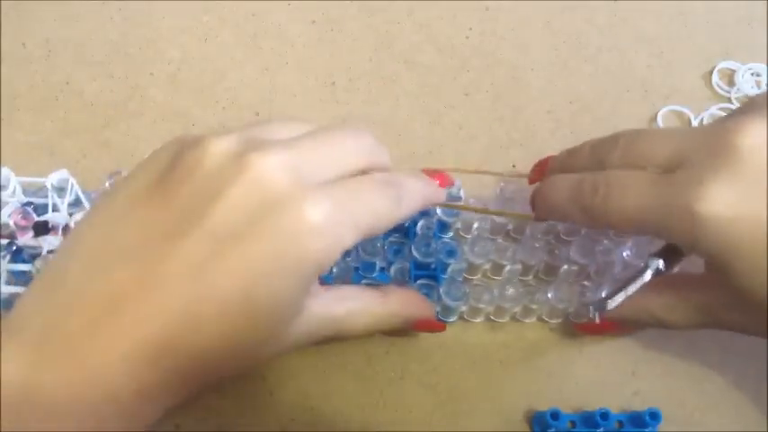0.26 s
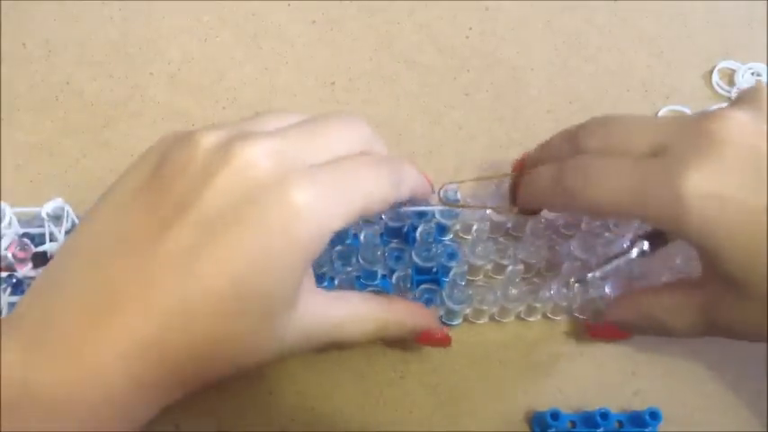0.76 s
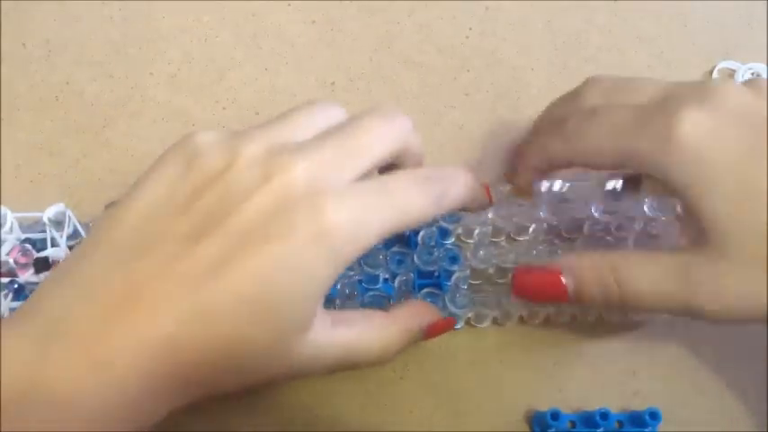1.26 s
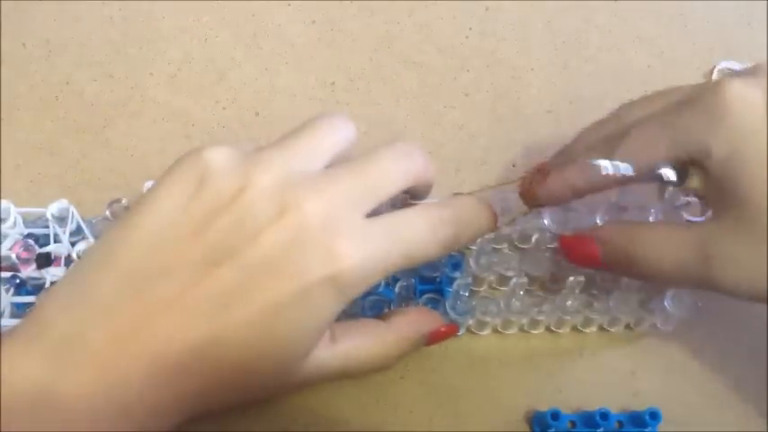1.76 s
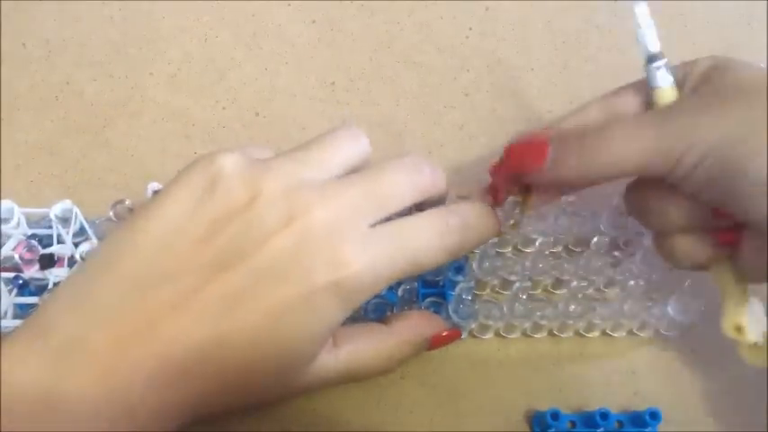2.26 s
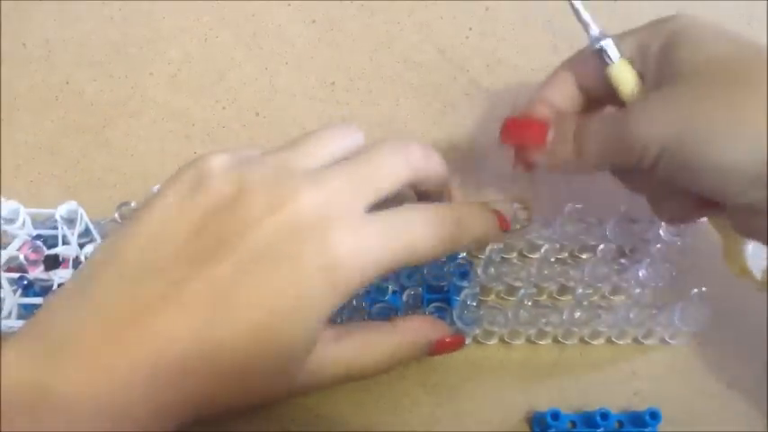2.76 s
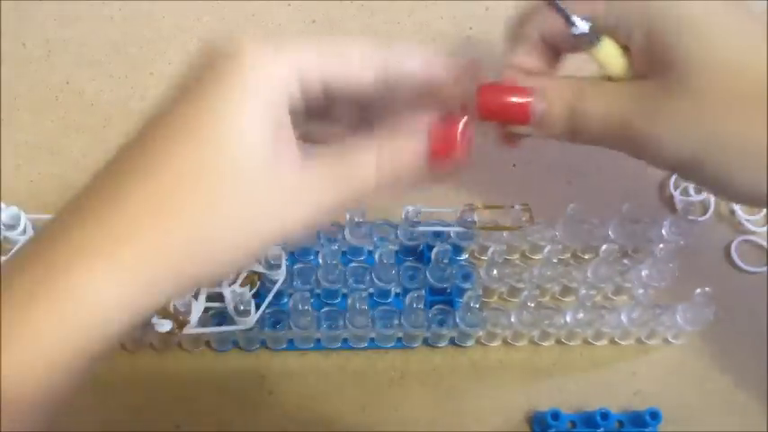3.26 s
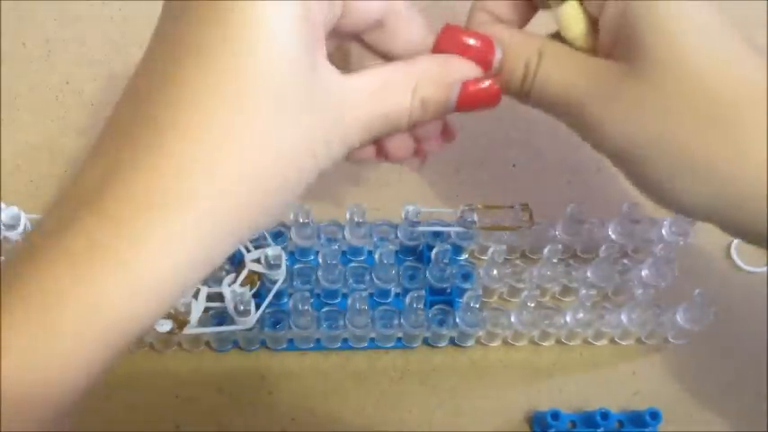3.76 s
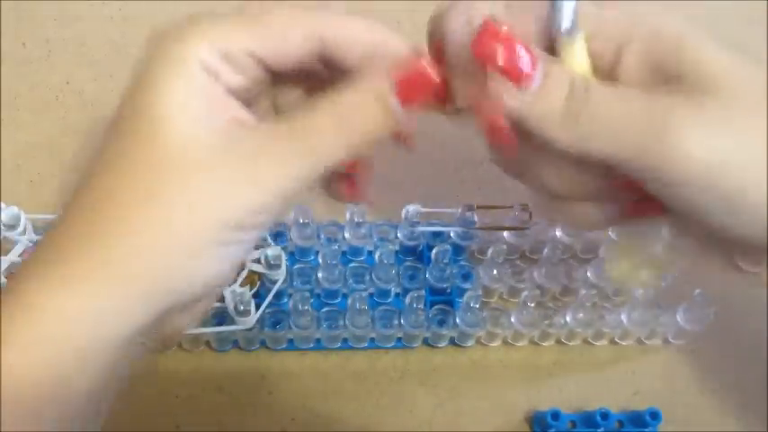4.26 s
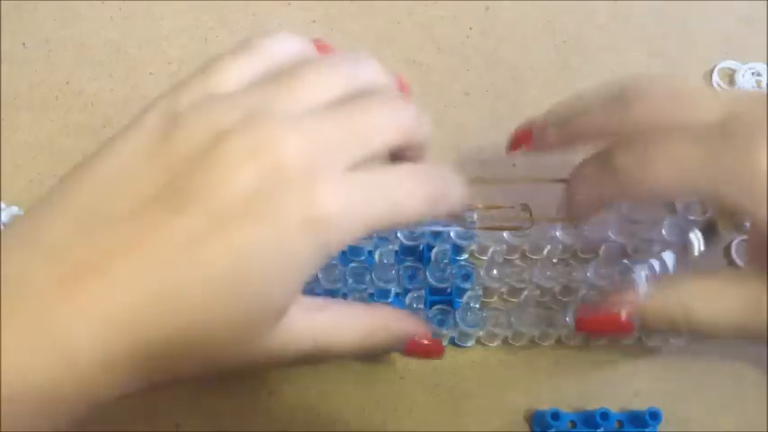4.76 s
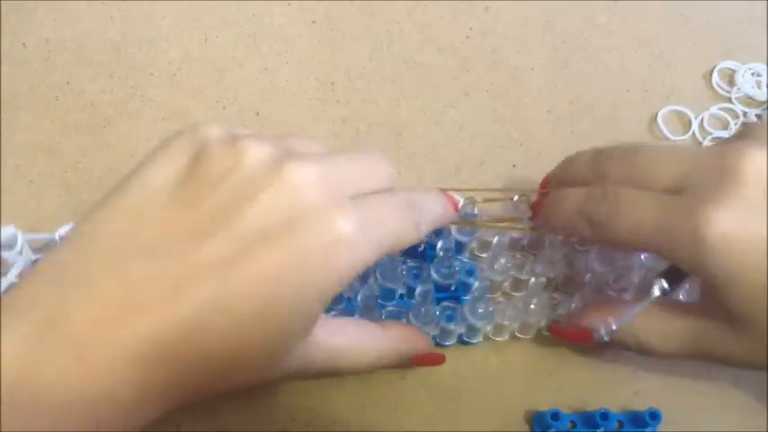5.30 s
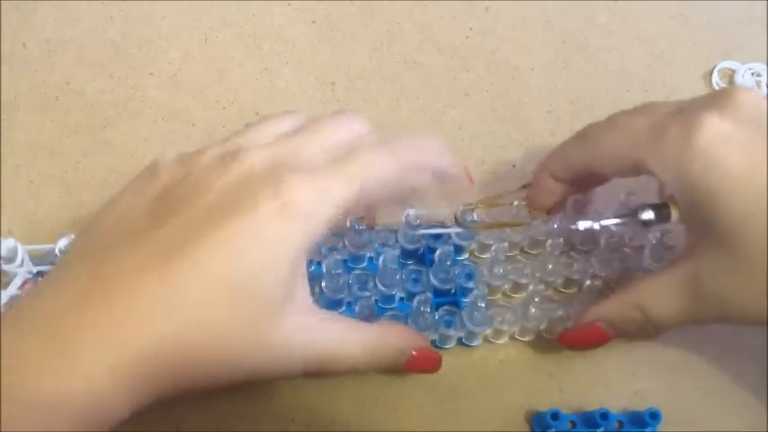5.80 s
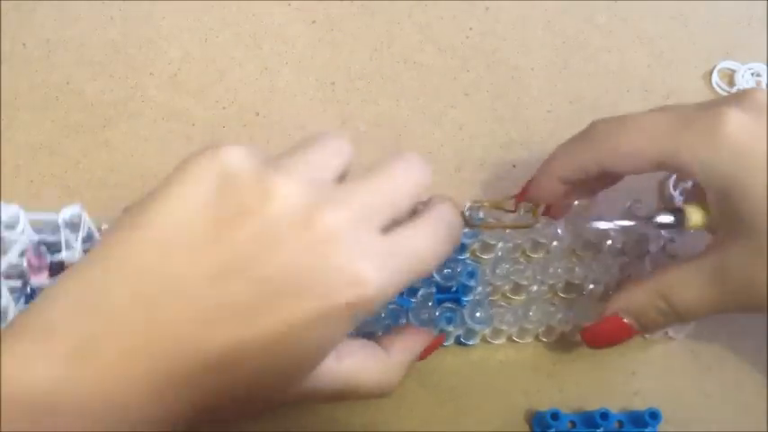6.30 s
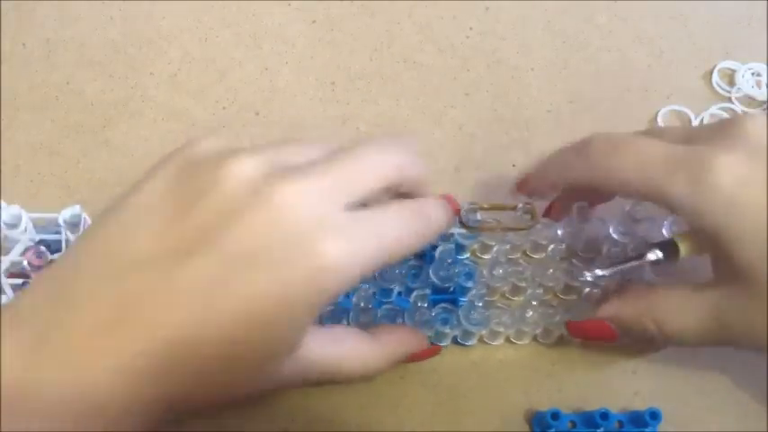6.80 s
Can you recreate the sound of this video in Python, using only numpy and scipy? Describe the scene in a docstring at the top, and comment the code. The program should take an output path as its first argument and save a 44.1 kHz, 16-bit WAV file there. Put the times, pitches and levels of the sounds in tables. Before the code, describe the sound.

Hollow plastic knocks and crisp little clicks as hands fit rubber bands over loom pegs on a table, close up in a small quiet room.

```python
"""Rubber bands on a plastic loom

Hands fit rubber bands over the pegs of a loom on a table, close to a phone in a small quiet room.
Knocks are thuds with ringing loom tones and a low table boom; clicks are bursts of tiny ticks ringing a peg.
Filtered noise makes the loom's scrape, the soft rubs on the pegs, the room's hush and a far low hum.
A few echoes and a fading noise tail place the knocks and clicks in the room."""
import sys
import numpy as np
from scipy import signal
from scipy.fft import rfft, irfft
from scipy.io import wavfile
from scipy.ndimage import uniform_filter1d

SR = 44100
rng = np.random.default_rng(int(sys.argv[2]) if len(sys.argv) > 2 else 0)


def int16_out(signal):
    """Quantize to a 16-bit WAV file."""
    q = np.round(np.clip(np.atleast_2d(signal).T, -1, 1) * 32767)
    wavfile.write(sys.argv[1], SR, q.astype(np.int16))


N = 310447  # length in samples, about 7 s


def undb(db):
    """Turn decibels into a gain."""
    return 10 ** (np.asarray(db) / 20)


def unit(x):
    """Scale a sound to an rms level of 1."""
    return x / np.sqrt(np.mean(x ** 2))


def coloured(n, points):
    """Noise at rms 1 whose spectrum follows points of (pitch_hz, level_db)."""
    hz, db = np.transpose(points)
    noise_hz = np.fft.rfftfreq(n, 1 / SR) + 1  # the 1 avoids log(0)
    shape = undb(np.interp(np.log(noise_hz), np.log(hz), db))
    return unit(irfft(rfft(rng.standard_normal(n)) * shape, n))


def ring(t, hz, t60):
    """Rows of sine tones, each fading by 60 dB in its t60 seconds, as struck objects do."""
    return np.sin(2 * np.pi * hz[:, None] * t) * 1000 ** (-t / t60[:, None])


def add(track, s, sound):
    """Mix a sound into the track at time s in seconds."""
    i = int(s * SR)
    track[i:i + len(sound)] += sound[:N - i]


def walk(rate):
    """A random curve gliding towards a new value about `rate` times a second."""
    k = int(SR / rate)
    steps = np.repeat(rng.standard_normal(N // k + 1), k)
    return uniform_filter1d(steps, k)[:N]


# Knocks of the loom on the table: start_s (before KNOCK_DELAY_S), peak_db (direct blow without boom),
# pitch_hz (tones near it ring most), boom_db and edge_db (table boom and sharp edge, before their fades,
# relative to the blow), share (free ringing, 0-1)
LOOM_KNOCKS = [(0.096, -37, 330, -32, -37, 0.6), (0.111, -34, 560, -25, -26, 0.55),
               (0.135, -23.5, 334, -20.5, -19, 0.64), (0.333, -39.5, 543, -36, -12, 0.45),
               (0.429, -22, 323, -30, -39, 0.23), (0.47, -19, 470, -29, -35, 0.87),
               (0.481, -22.5, 442, -35, -26, 0.24), (0.518, -10.5, 369, -19.5, -10, 0.37),
               (0.713, -42.5, 377, -17, 10, 0.65), (0.774, -51, 610, -30, -14, 0.75),
               (0.836, -50.5, 730, 3, -25, 0.85), (0.95, -47.5, 596, 0, -33, .8),
               (1.013, -47.5, 630, -10, -27, 0.73), (1.055, -46, 555, -23, -25, 0.8),
               (1.088, -48, 624, -30, -22, 0.8), (1.137, -46.5, 270, 1, -29, 0.05),
               (1.188, -39, 323, -22, -28, 0.5), (1.208, -33, 243, -1, -15, 0.29),
               (1.444, -29.5, 690, -17.5, -2, 0.77), (1.558, -46.5, 640, -19, 1, 0.48),
               (1.668, -54, 980, -22, -10, 1), (1.699, -38.5, 1020, -14, -4, 0.52),
               (1.722, -41, 1020, 1, -14, 0.87), (1.77, -42, 580, -19, 2, 0.9),
               (1.789, -45.5, 205, -6, -21, 0.29), (1.867, -53, 220, -7, -24, 0.3),
               (2.408, -47, 690, -24, -22, 0.4), (2.436, -48, 263, -17, -27, 0.83),
               (2.508, -43.5, 514, -2.5, -0.5, 0.6), (2.634, -41.5, 653, -27, -1, 0.29),
               (2.829, -38, 297, -4, -42, 0.24), (3.114, -42, 396, -5, -14, 0.86),
               (3.237, -46, 296, 6, -25, 0.5), (4.162, -42.5, 814, -38, 0, 0.35),
               (4.5, -48.5, 403, -40.5, 2, 0.86), (4.87, -36.5, 620, -1, -26, 0.43),
               (5.063, -52.5, 720, -9, -18, .25), (5.444, -16.5, 396, -14, -15.5, 0.42),
               (5.703, -41.5, 606, -28, 1, 0.53), (5.847, -30, 480, -24, -40, 0.46),
               (5.95, -48.5, 323, -32, -21, 0), (6.002, -47.5, 570, -11, -5, 0.8),
               (6.068, -45, 1280, -9, -14, 0.33), (6.221, -39, 650, -37, -21, 0.96),
               (6.237, -35, 630, -30, -17, 0.38), (6.287, -21, 503, -31, 0.5, 0.4),
               (6.521, -35.5, 587, -37, 6, 0.62), (6.656, -48, 424, -33, -24, 0.07),
               (6.705, -30.5, 528, -37, 0, 0.16), (6.904, -12, 402, -26, -8, 0.35)]
# Tones of the loom and table top: pitch_hz (before a small random detune),
# level_db (relative, before weighting by the blow), t60_s (time to fade 60 dB)
LOOM_TONES = [(197.7, 23.5, 0.43), (269, -14.5, 0.19), (292, 8, 0.082), (323, 9, 0.19), (396, 4, 0.24),
              (433.4, 17, 0.11), (542, 3, 0.086), (620, 2, 0.089), (701.4, 3, 0.36), (813, -25.5, 0.041),
              (994, 2, 0.06), (1020, 6.5, .12), (1200, -31, 0.076), (1286, 7.5, 0.053)]
KNOCK_DELAY_S = 0.0043  # each knock sounds this long after its listed start
BOOM_HZ, BOOM_T60_S, BOOM_SWING_S = 146, 0.23, 0.06
KNOCK_ROOM_DB, KNOCK_ROOM_DB_PER_OCTAVE = 2, -2.5  # at 400 Hz; low blows fill the room more
RING_ROOM_DB = -4.5  # per unit of share: a freely ringing blow is heard more directly
PUFF_S = 0.0027  # fade of the short thud sent to the walls


def knocks(heard):
    """A quick thud sets off the tones near the blow's pitch, and the heavy table top booms below."""
    out, t = np.zeros(N), np.arange(SR // 2) / SR
    hz, db, t60 = np.transpose(LOOM_TONES)
    chance = rng.random((len(LOOM_KNOCKS), len(LOOM_TONES) + 1))
    for (s, peak_db, pitch, boom_db, edge_db, share), (spot, *detune) in zip(LOOM_KNOCKS, chance):
        # A freely ringing blow picks out fewer tones near its pitch.
        octaves = 0.6 - 0.18 * share
        reach = np.exp(-(np.log2(hz / pitch) / octaves) ** 2)
        detuned_hz = hz * (1 + 0.013 * (np.array(detune) - 0.5))
        tones = (undb(db) * reach) @ ring(t, detuned_hz, t60)

        thud_hz = (1.25 - 0.37 * share) * pitch
        thud, edge, boom = ring(t, np.array([thud_hz, 1400, BOOM_HZ]),
                                np.array([0.022, 0.0035, BOOM_T60_S]))
        boom = boom * (1 - np.exp(-t / BOOM_SWING_S))  # the heavy top takes a moment to swing
        blow = (1 - share) * thud + share * tones / np.abs(tones).max()
        blow = blow / np.abs(blow).max() + undb(edge_db) * edge

        # The walls get the thud and edge, without the loom's separate tones.
        puff = (1 - share) * thud * np.exp(-t / PUFF_S)
        to_walls = puff + share * thud + undb(edge_db - 6) * edge
        wet_db = KNOCK_ROOM_DB + KNOCK_ROOM_DB_PER_OCTAVE * np.log2(pitch / 400)
        wet_db += RING_ROOM_DB * (share - 0.45)
        sound = heard(blow, to_walls, spot, wet_db)
        sound[:len(t)] += undb(boom_db) * boom
        add(out, s + KNOCK_DELAY_S, -undb(peak_db) * sound)  # minus flips the wave
    return out


# Bands, nails and hook clicking on the pegs: start_s, peak_db (direct sound), pitch_hz,
# rattle_ms (time for the ticks to fade to about a third), reach_octaves (crack's reach above the pitch)
PEG_CLICKS = [(0.1072, -45.5, 5010, 3.5, 0.66), (0.3346, -37, 5340, 4.2, 1.7),
              (0.4736, -14.5, 5240, 5.25, 0.55), (0.5215, -31, 5860, 1.9, 1.5),
              (0.7169, -41.5, 6430, 3, 0.59), (0.7782, -32, 6300, 1.9, 0.35), (0.98, -38, 4670, 2.9, 1.02),
              (1.1139, -51, 8200, 2.6, 1.7), (1.1454, -46, 3800, 1.2, 0.62), (1.1942, -48, 8300, 1.9, 1.2),
              (1.3322, -56, 2890, 3, 0.42), (1.448, -28, 8450, 3.6, 2.9), (1.702, -34, 6630, 3, 0.73),
              (1.7894, -37, 6500, 1.1, 1.6), (1.816, -42, 6470, 2.1, 1.3), (2.5628, -46, 3940, 1.9, 1.5),
              (2.638, -41.5, 4470, 2.5, 0.85), (2.6674, -56, 6280, 2.2, 1.6), (2.689, -48, 2980, 3.4, 2.2),
              (2.831, -37.5, 6380, 2.5, 0.96), (2.898, -46, 3180, 1.4, 1.2), (2.969, -46, 3660, 2, 1.36),
              (3.0566, -46, 4500, 2.5, 0.91), (3.1439, -50, 6440, 3.3, 1.3), (3.829, -48.5, 2510, 1.1, 2.8),
              (3.902, -51.5, 2860, 1.7, 2.7), (4.0006, -54, 5270, 2.2, 1.5),
              (4.166, -28.5, 3270, 1.97, 2.8), (4.359, -44, 4260, 2.7, 3.8),
              (4.5007, -43.5, 5400, 2.2, 1.3), (4.8744, -39.5, 5320, 0.91, 0.35),
              (5.068, -40.5, 7250, 2, 1.2), (5.1996, -56.5, 5200, 1.8, 1.1),
              (5.3685, -54.5, 2620, 2.6, 0.85), (5.7051, -46.5, 2860, 3.5, 0.21),
              (5.8273, -44, 3020, 3.9, 0.87), (5.8483, -26, 3350, 4.2, 1.24),
              (5.8529, -28.5, 5450, 1.3, 1.6), (5.9485, -39.5, 7100, 2, 1.28),
              (6.0092, -36.5, 6560, 2, 1.7), (6.226, -39.5, 3470, 5.8, 1.45), (6.243, -40.5, 5130, 3.4, 1),
              (6.2902, -40.5, 2600, 3.1, 0.74), (6.523, -30, 6550, 2.8, 1.53),
              (6.907, -38.5, 2600, 1.6, 1.4)]
# Tones of one peg: ratio (times the click's pitch), level_db (relative), t60_s (time to fade 60 dB)
PEG_TONES = [(.8, -6, .003), (1.0, 0, .0045), (1.22, -3, .003), (1.6, -10, .003)]
BARE, BARE_PER_OCTAVE = 0.19, 0.24  # share of broad crack in a click; grows with the crack's reach
CLICK_ROOM_DB, CLICK_ROOM_DB_PER_OCTAVE = -0.2, -0.5  # wide cracks sound drier
# Octaves the crack reaches under a 5 kHz peg; more under higher pegs and for wide cracks
CRACK_BELOW, CRACK_BELOW_PER_OCTAVE, CRACK_BELOW_SHARE = 0.18, 0.82, 0.59


def clicks(heard):
    """A snap and a short rattle of smaller ticks ring a peg, mixed with a broad bare crack."""
    out, t = np.zeros(N), np.arange(1024) / SR
    ratio, db, t60 = np.transpose(PEG_TONES)
    grit = rng.standard_normal((len(PEG_CLICKS), 2, len(t)))
    spots = rng.random(len(PEG_CLICKS))
    for (s, peak_db, pitch, rattle_ms, above), (a, b), spot in zip(PEG_CLICKS, grit, spots):
        ticks = a * np.abs(b) * np.exp(-t * 1000 / rattle_ms)
        ticks[0] = 1.5  # the first snap
        peg = undb(db) @ ring(t, ratio * pitch, t60)

        # The crack is a single impulse, limited to a band around the pitch.
        below = CRACK_BELOW + CRACK_BELOW_PER_OCTAVE * np.log2(pitch / 5000) + CRACK_BELOW_SHARE * above
        below = max(below, 0.1)
        edges_hz = np.clip(pitch * 2 ** np.array([-below, above]), 300, 19000)
        band = signal.butter(2, edges_hz, "band", fs=SR, output="sos")
        crack = signal.sosfilt(band, t == 0)

        bare = np.clip(BARE + BARE_PER_OCTAVE * above, 0, 1)
        tick = (1 - bare) * peg / np.linalg.norm(peg) + bare * crack / np.linalg.norm(crack)
        click = signal.fftconvolve(ticks, tick)[:len(t)]  # every tick sets off the same sound
        wet_db = CLICK_ROOM_DB + CLICK_ROOM_DB_PER_OCTAVE * above
        add(out, s, undb(peak_db) * heard(click, tick, spot, wet_db))
    return out


# Loom dragged on the table: time_s, level_db (average level, around which the scrape wavers)
LOOM_DRAG = [(0.0, -68.5), (0.17, -65), (0.42, -71), (0.53, -58), (0.84, -67), (1.17, -61.5), (1.53, -74.5),
             (1.78, -63), (2.08, -70), (2.45, -72.5), (2.56, -66), (2.74, -69.5), (2.87, -65),
             (3.12, -64.5), (3.31, -74), (4.78, -70), (5.55, -64.5), (6.35, -69), (6.61, -59.5),
             (6.75, -74), (7.04, -60)]


def dragging():
    """Uneven friction of the loom on the table: dull noise whose level wavers."""
    t = np.arange(N) / SR
    scrape = coloured(N, [(90, -39), (146, 9.0), (300, 10.0), (650, 6.5), (1100, -2), (3000, -34.0)])
    scrape = unit(scrape * undb(4.3 * walk(23)))
    return scrape * undb(np.interp(t, *np.transpose(LOOM_DRAG)))


# Skin and rubber rubbing over the pegs: start_s, end_s, level_db (before fades and grain), centre_hz
PEG_RUBS = [(0.095, 0.123, -69, 4930), (0.794, 0.904, -75, 5000), (1.694, 1.766, -61, 3270),
            (1.76, 1.797, -60, 4170), (1.79, 1.84, -65.5, 5570), (1.867, 1.89, -67.5, 4370),
            (2.465, 2.614, -64, 4900), (2.642, 2.733, -72, 9000), (3.041, 3.102, -65.5, 6900),
            (4.477, 4.526, -69.5, 4930), (4.884, 4.908, -61.5, 4370), (6.065, 6.099, -66, 3200),
            (6.137, 6.165, -69.5, 3670), (6.218, 6.244, -58.5, 7000)]
RUB_OCTAVES, RUB_WIDENING = 1.3, 0.79  # width setting at 5 kHz; wider per octave of centre


def rubbing():
    """Friction of skin and rubber on the pegs: short bands of noise with a fast, grainy level."""
    out = np.zeros(N)
    grain = undb(2.5 * walk(440))
    for start, end, db, hz in PEG_RUBS:
        octaves = RUB_OCTAVES + RUB_WIDENING * np.log2(hz / 5000)
        near, far = 2 ** (octaves / 2), 4 ** octaves
        i, n = int(start * SR), int((end - start) * SR)
        rub = coloured(8192, [(hz / far, -30), (hz / near, -3), (hz, 0), (hz * near, -3), (hz * far, -30)])
        fade = signal.windows.tukey(n, 0.5)
        add(out, start, undb(db) * rub[:n] * fade * grain[i:i + n])
    return out


# Echoes from nearby surfaces: delay_ms, level_db (before each sound's own room level is added)
NEAR_ECHOES = [(3.3, -12.5), (6.5, -28.5), (12.5, -20), (29, -23.5)]
# Bands of the room's tail: centre_hz, level_db (before the scaling in room()), t60_s (time to fade 60 dB)
ROOM_TAIL = [(208, -16.5, 0.33), (519, -20.5, 0.25), (1087, -6, 0.19), (2963, -13.5, 0.23),
             (5860, -13.5, 0.27), (11830, -16, 0.23)]


def room():
    """Surfaces return a few echoes, then a diffuse noise tail that fades band by band."""
    t = np.arange(SR // 3) / SR
    bands = np.array([coloured(2 * SR, [(hz / 3, -40), (hz / 1.826, -3), (hz, 0),
                                        (hz * 1.19, -3), (hz * 3, -40)])
                      for hz, _, _ in ROOM_TAIL])
    hz, db, t60 = (column[:, None] for column in np.transpose(ROOM_TAIL))
    fade = undb(db - 24) * np.sqrt(hz / 10000) * 1000 ** (-t / t60)
    fade = fade * (1 - np.exp(-t / 0.00022))  # soft start

    def heard(sound, radiated, spot, wet_db):
        """The walls scatter the radiated sound's overall colour; fine detail comes directly and in echoes."""
        i = int(spot * SR)  # each spot uses its own stretch of the tail noise
        out = np.zeros(len(t) + len(sound))
        power = np.sqrt(np.sum(sound ** 2) / np.sum(radiated ** 2))  # match the direct sound's energy
        response = (bands[:, i:i + len(t)] * fade).sum(axis=0)
        tail = signal.fftconvolve(radiated * power, response)
        out[:len(tail)] = undb(wet_db) * tail
        out[:len(sound)] += sound
        for ms, echo_db in NEAR_ECHOES:
            k = int(ms * SR / 1000)
            out[k:k + len(sound)] += undb(echo_db + wet_db) * sound
        return out / np.abs(sound).max()
    return heard


# A far low hum that swells and fades: time_s, level_db
HUM_LEVEL = [(0, -68.5), (3.6, -76.5), (4.1, -68.5), (4.7, -71), (5, -95), (7.04, -73.5)]
HUM_HZ = 300.7


def hum():
    """A distant hum: a narrow band of noise that swells and fades."""
    noise = coloured(N, [(HUM_HZ / 2, -30), (HUM_HZ / 1.42, -6), (HUM_HZ, 0),
                         (HUM_HZ * 1.09, -8), (HUM_HZ * 2, -30)])
    return noise * undb(np.interp(np.arange(N) / SR, *np.transpose(HUM_LEVEL)))


# Colour of the hush and hiss: pitch_hz, level_db (relative)
HUSH_COLOUR = [(59, -44), (100, -3), (135, -4.5), (433, -16.5), (570, -22.5), (621, -23.5), (910, -10.5),
               (1100, -7), (1420, -8.5), (2470, -9), (2930, -11), (3120, -10.5), (14700, -19),
               (16000, -19.5)]
HUSH_DB = -70  # level around which the hush slowly wavers


def hush():
    """The room's hush and the microphone's hiss: one coloured noise with a slightly wavering level."""
    return coloured(N, HUSH_COLOUR) * undb(HUSH_DB + 0.5 * walk(3.9))


def scene():
    """Knocks and clicks in the room, with soft sliding over the hush and hum."""
    heard = room()
    handling = knocks(heard) + clicks(heard) + dragging() + rubbing()
    return (handling + hum() + hush())[None]


TOP_HZ = 15400  # the phone passes little above this


def record(dry):
    """The phone cuts the bass steeply, adds a faint rumble of its own and cuts the top."""
    bass_cut = signal.cheby2(5, 32, 85., "high", fs=SR, output="sos")
    top_cut = signal.ellip(10, .2, 60, TOP_HZ, fs=SR, output="sos")
    rumble = undb(-102) * coloured(N, [(25, -8.5), (60, 13.5), (100, 6), (200, -41)])
    return signal.sosfilt(top_cut, signal.sosfilt(bass_cut, dry) + rumble)


dry = scene()
out = record(dry)
int16_out(out)
```